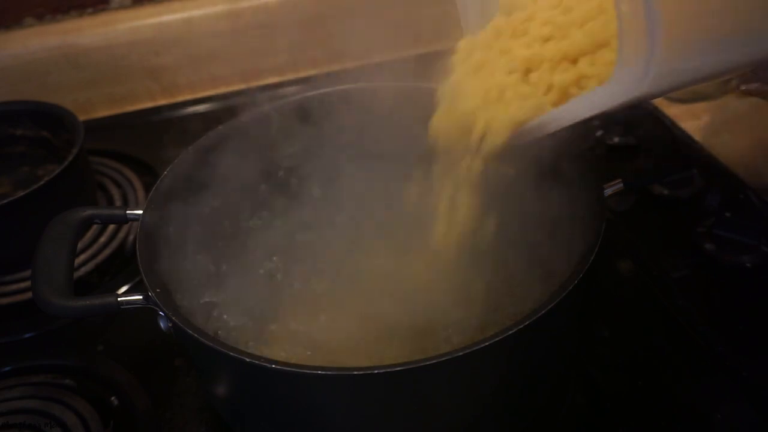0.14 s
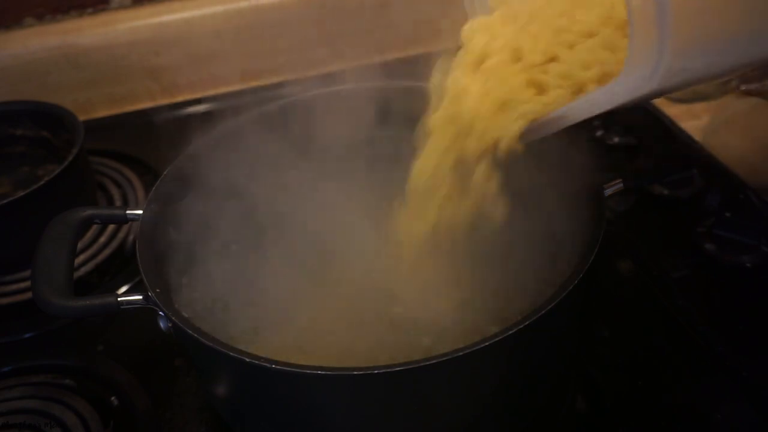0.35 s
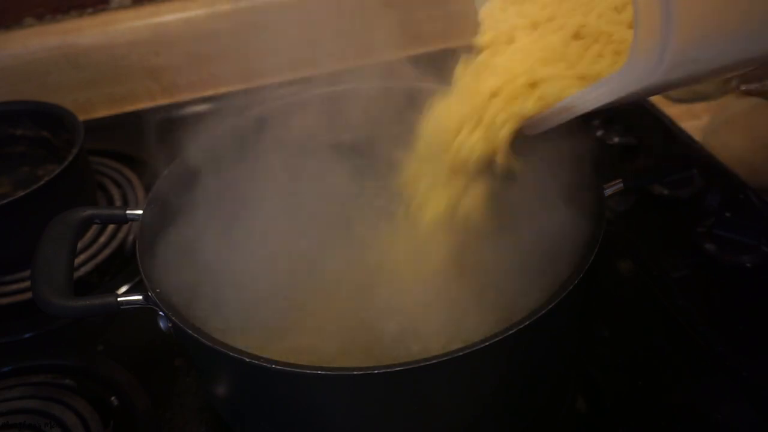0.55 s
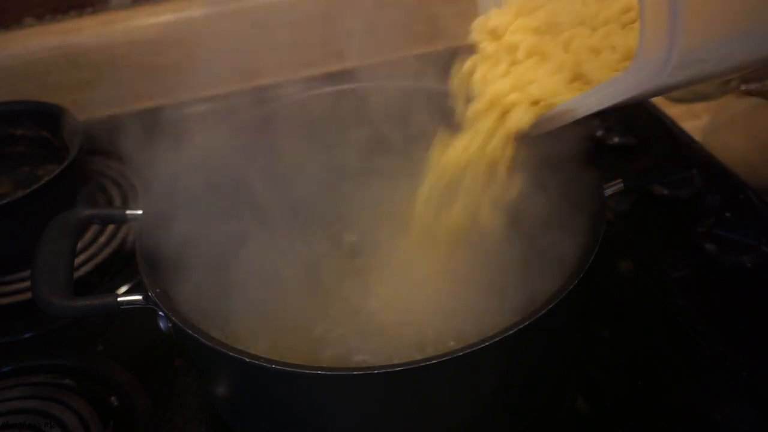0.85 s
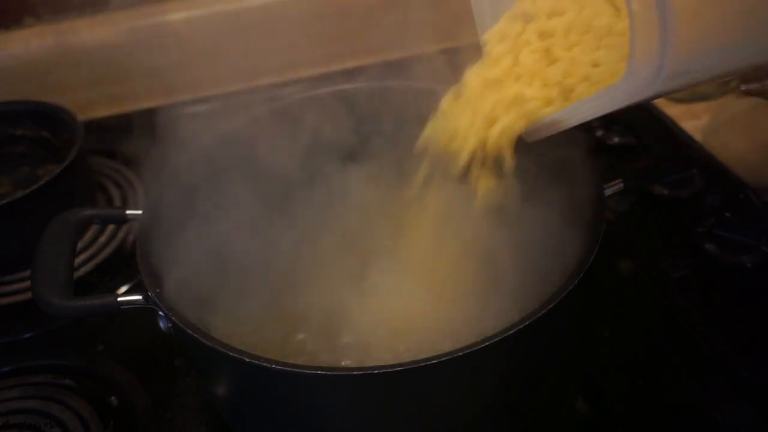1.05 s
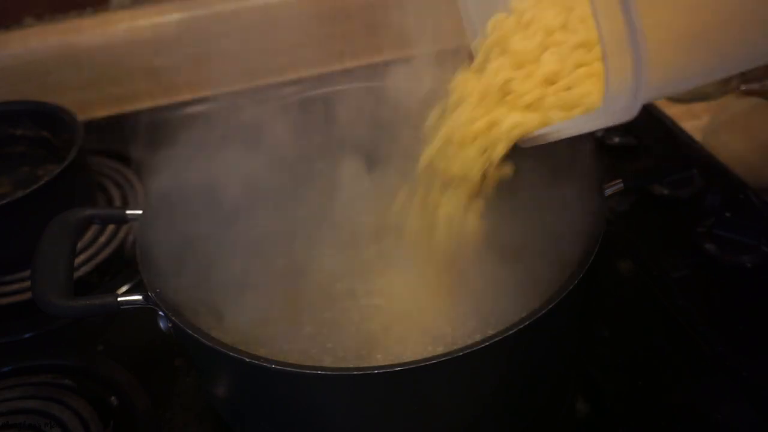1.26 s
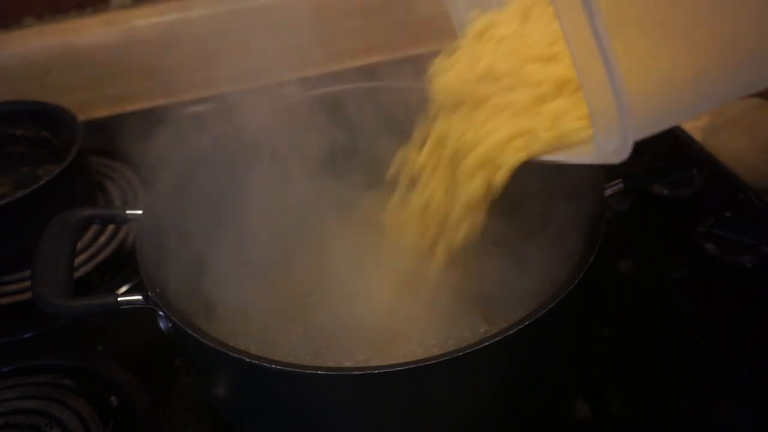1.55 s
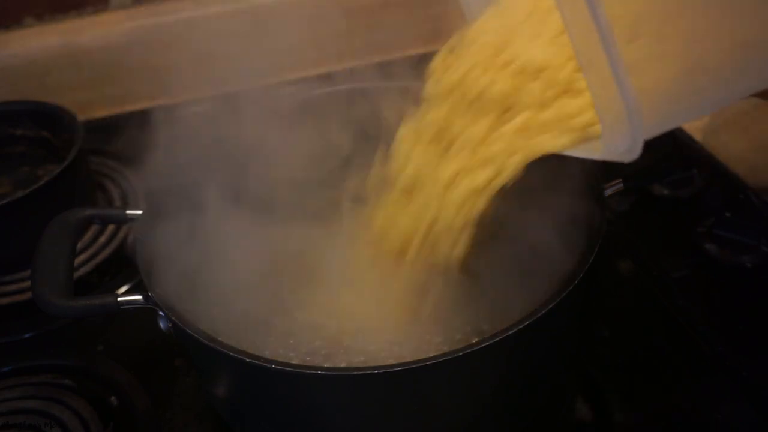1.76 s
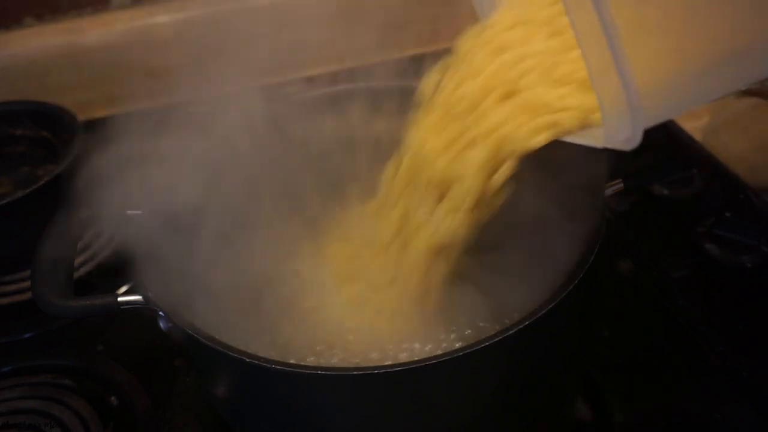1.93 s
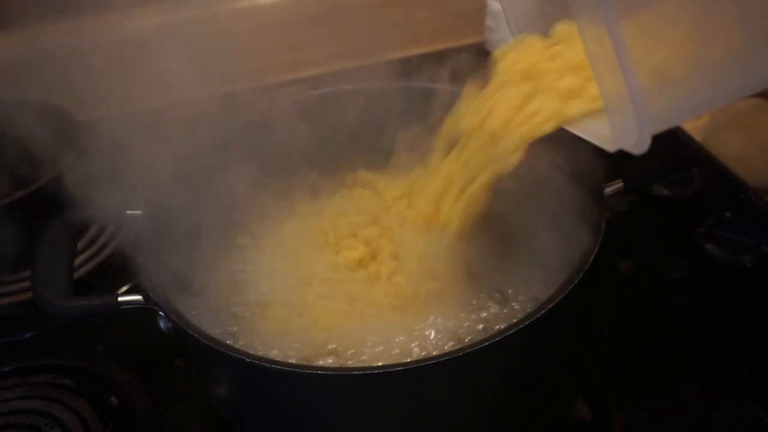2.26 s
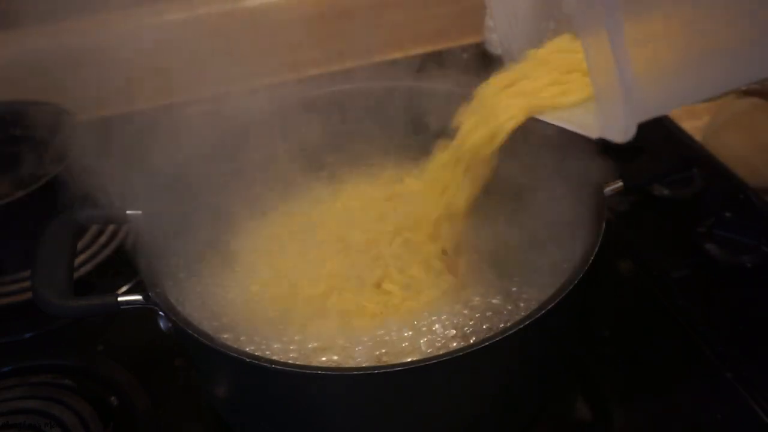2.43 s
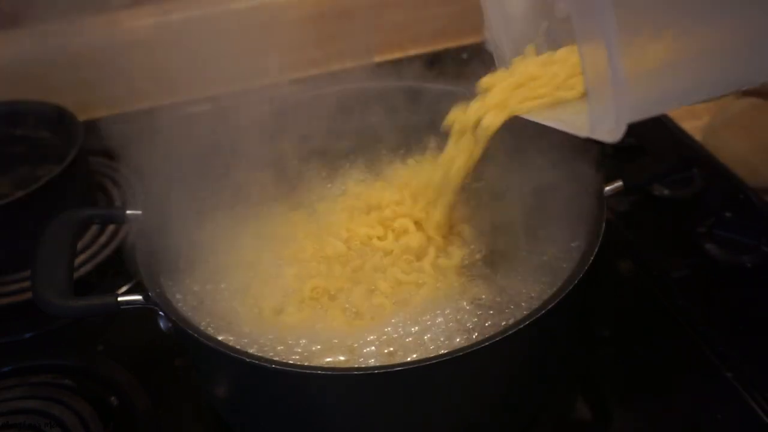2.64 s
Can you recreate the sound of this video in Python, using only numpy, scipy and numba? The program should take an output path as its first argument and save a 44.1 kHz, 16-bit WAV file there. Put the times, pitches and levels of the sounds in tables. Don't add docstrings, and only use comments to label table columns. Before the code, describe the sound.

A continuous rush of hard pasta pieces ticks, pings and plunges into hot water, ringing the pot, then piles into a rattling, fizzing heap and thins slightly; recorded close in stereo, indoors, with faint early hum.

```python
import sys
import numpy as np
from scipy import signal
from scipy.fft import rfft, irfft, next_fast_len
from scipy.io import wavfile
from scipy.ndimage import uniform_filter1d
from numba import njit

SR = 44100
rng = np.random.default_rng(int(sys.argv[2]) if len(sys.argv) > 2 else 0)


def amplitude_ratio(level_db):
    exponent = np.asarray(level_db, float) / 20
    return 10 ** exponent


def store_pcm(level_fs):
    pcm = np.round(np.clip(level_fs, -1, 1) * 32767).astype(np.int16)
    wavfile.write(sys.argv[1], SR, np.atleast_2d(pcm).T)


N = 123479
LEAD_IN = 64


def unit(x):
    return x / np.sqrt(np.mean(x ** 2))


def curve(table, axis):
    rows = np.array(table)
    return np.interp(np.arange(N) / SR, rows[:, 0], rows[:, axis])


def walk(rate_hz):
    hold = int(SR / rate_hz)
    steps = np.repeat(rng.standard_normal(400), hold)[:N + hold]
    slewed = uniform_filter1d(uniform_filter1d(steps, hold), hold)[:N]
    return slewed / slewed.std()


def colour(x, table):
    hz, rows = np.fft.rfftfreq(4096, 1 / SR) + 1, np.array(table)
    gain = amplitude_ratio(np.interp(np.log(hz), np.log(rows[:, 0]), rows[:, 1]))
    cepstrum = irfft(np.log(gain))
    cepstrum[1:2048] *= 2
    cepstrum[2049:] = 0
    impulse = irfft(np.exp(rfft(cepstrum)))
    return signal.fftconvolve(x, impulse[None], axes=1)[:, :N]


@njit
def rings(at_s, hz, cycles, left, right, lag, n):
    out = np.zeros((2, n + 4096))
    for k in range(len(at_s)):
        turn = np.exp(2j * np.pi * hz[k] / SR - hz[k] / SR / cycles[k])
        start_l = at_s[k] * SR
        start_r = start_l + lag[k]
        i, j = int(start_l), int(start_r)
        ring_l = turn ** (i + 1 - start_l)
        ring_r = turn ** (j + 1 - start_r)
        for m in range(min(4000, int(5 * cycles[k] * SR / hz[k]) + 2)):
            out[0, i + 1 + m] += left[k] * ring_l.imag
            out[1, j + 1 + m] += right[k] * ring_r.imag
            ring_l *= turn
            ring_r *= turn
    return out[:, LEAD_IN:n + LEAD_IN]


def shower(count, lo_hz, hi_hz, cycles, scatter_db, pan_db, spread_db, spread_us):
    calming = 0.72
    when, pitch, rarity = rng.random((count, 3)).T
    place, delay, other = rng.standard_normal((count, 3)).T
    hz = np.minimum(lo_hz * (hi_hz / lo_hz) ** pitch, .45 * SR)
    size_db = -scatter_db * (3.5 + np.log(rarity + 0.0047)) * (1 - calming * when)
    size = amplitude_ratio(size_db) * hz / hi_hz * np.sign(other)
    pan = pan_db + np.clip(spread_db, 0, 5) * place
    lag = np.clip(spread_us * 1e-6 * SR * delay, -30, 30)
    at_s = 32 / SR + when * N / SR
    return unit(rings(at_s, hz, cycles * amplitude_ratio(2.96 * other), size * amplitude_ratio(pan / 2), size * amplitude_ratio(-pan / 2), lag, N))


def ring_pot(x, db, heap):
    # (frequency [Hz], width [Hz], level [dB])
    modes = [(355.6, 85, 16), (795, 37, 0.5), (963, 56, 0.5), (1170, 60, -6), (1620, 290, -11),
             (2290, 70, -5), (2410, 41, 1), (3022, 61, -2), (3480, 68, -2), (3825, 150, -4),
             (4570, 380, -11)]
    waver_db, waver_hz, heap_db = 1.5, 18.0, 1
    out = x
    for hz, width_hz, mode_db in modes:
        level_db = db + mode_db + waver_db * walk(waver_hz) + heap_db * heap * (1500 < hz < 2700)
        out = out + amplitude_ratio(level_db) * signal.lfilter(*signal.iirpeak(hz, hz / width_hz, fs=SR), x)
    return out


def rattle(flow_db, heap):
    # (frequency [Hz], level [dB])
    tick_colour = [(400, -84), (1500, -27.5), (2500, -7), (5000, -5), (9000, -3), (10800, -6), (13000, -1),
                   (15700, -3.5)]
    ticks = shower(count=16000, lo_hz=1506.0, hi_hz=19860.0, cycles=3.0,
                   scatter_db=2.0, pan_db=-1.5, spread_db=4.0, spread_us=16.4)
    clumps_db = (1 - 1.1 * heap) * (0.47 * walk(21.0) + 2.3 * walk(80))
    return unit(colour(ticks, tick_colour)) * amplitude_ratio(-4.5 + flow_db + 4.1 * heap + clumps_db)


def splash(flow_db, heap):
    # (frequency [Hz], level [dB])
    splash_colour = [(250, -38), (550, -26), (800, -7), (1400, -7.5), (2400, -2.5), (4000, -1), (9000, -6),
                     (16000, -4.5)]
    level_db, heap_db = -3, -12
    plops = shower(count=20000, lo_hz=397.3, hi_hz=18600.0, cycles=1.76,
                   scatter_db=1.5, pan_db=-1.34, spread_db=3.5, spread_us=27.8)
    wet = unit(colour(ring_pot(plops, 1.0, heap), splash_colour))
    clumps_db = (1 - 0.7 * heap) * (0.27 * walk(18.1) + .8 * walk(59.96))
    return wet * amplitude_ratio(level_db + flow_db + heap_db * (heap - .5) + clumps_db)


def knocks():
    # (time [s], crack level [dB], ring level [dB], ring pitch [Hz])
    hits = [(0.0074, 1, -31, 2400), (0.0792, 0, -25, 2480), (0.1111, -4, -29, 2100),
            (0.1182, -14, -19, 4850), (0.145, -13, -36, 3140), (0.1715, -6, -34, 4580),
            (0.1844, -4, -26, 3930), (0.2083, -15, -18, 2370), (0.229, -13, -21, 3050),
            (0.2325, -8, -19, 2310), (0.2424, -13, -26, 3940), (0.2614, -10, -26, 3860),
            (0.2816, -4, -20, 2290), (0.2958, -12, -28, 2270), (0.4154, -11, -25, 2220),
            (0.424, 2.5, -22, 3040), (0.559, -11, -12.5, 3740), (0.617, 2, -30, 2430),
            (0.737, -11, -23, 2840), (0.801, -11, -20, 2260), (0.9149, -17, -15, 3200),
            (1.0816, -9, -19, 2380), (1.1734, -15, -20, 2200), (1.258, -6, -24, 4600),
            (1.412, -19, -31, 4530), (2.6708, -19, -24, 3460), (2.709, -18, -30, 3120),
            (2.7362, -12, -20, 4170), (2.7616, -12, -20.5, 4690)]
    at_s, crack_db, ring_db, ring_hz = np.array(hits).T
    at_s = np.r_[at_s, at_s] + LEAD_IN / SR + 0.000762
    size = amplitude_ratio(np.r_[crack_db - 1, ring_db + 6.5])
    hz = np.r_[0 * ring_hz + 13000., ring_hz]
    cycles = np.r_[0 * ring_hz + 1.3, 0 * ring_hz + 3.0]
    sound = rings(at_s, hz, cycles, size * amplitude_ratio(-3.5), size * amplitude_ratio(1.0), 0 * at_s, N)
    return signal.sosfilt(signal.butter(3, 1200, "high", fs=SR, output="sos"), sound)


def pings():
    # (time [s], level [dB], pitch [Hz])
    collisions = [(0.005, -21, 4700), (0.006, -22, 8500), (0.007, -21, 14470), (0.007, -24, 12050),
                  (0.049, -21.5, 2410), (0.118, -20, 4850), (0.122, -18, 14980), (0.145, -16, 5700),
                  (0.17, -17, 8610), (0.184, -22, 12300), (0.207, -17, 2230), (0.233, -17, 13780),
                  (0.241, -16, 3960), (0.28, -21, 13600), (0.294, -16, 14980), (0.295, -27, 7570),
                  (0.303, -17.5, 2250), (0.318, -17, 5340), (0.321, -19, 9300), (0.422, -15.5, 4990),
                  (0.422, -21, 10160), (0.438, -17, 12570), (0.444, -21, 8700), (0.475, -15, 12230),
                  (0.478, -23, 9810), (0.491, -18, 11880), (0.548, -19, 8260), (0.586, -13, 12740),
                  (0.616, -16, 13200), (0.737, -20, 7750), (0.747, -26, 10200), (0.79, -15, 14290),
                  (0.801, -26, 10500), (0.851, -17, 8300), (0.886, -20, 14980), (0.951, -22, 10160),
                  (0.979, -19, 9600), (0.998, -17, 14400), (1.061, -17, 2920), (1.082, -20, 12570),
                  (1.092, -19, 11540), (1.098, -19, 13700), (1.1, -16, 10330), (1.1, -18, 2230),
                  (1.108, -21, 12910), (1.174, -19, 4820), (1.177, -25, 9200), (1.184, -21, 6800),
                  (1.234, -15, 13430), (1.26, -13, 14980), (1.28, -15.5, 4130), (1.28, -26, 13600),
                  (1.326, -12, 14980), (1.413, -14.5, 9700), (1.669, -20.5, 2410), (1.694, -17, 6100),
                  (1.715, -15, 12910), (2.135, -13, 14400), (2.709, -23, 6440), (2.778, -17, 9100)]
    level_db, decay_s, spread_s = -0.5, 0.0019, .0015
    at_s, db, hz = np.repeat(np.array(collisions), 3, axis=0).T
    delay, detune, place = rng.standard_normal((len(at_s), 3)).T
    size, pan = amplitude_ratio(db + level_db), -2.4 + 1.6 * place
    start_s = np.maximum(at_s + spread_s * delay, 0) + LEAD_IN / SR
    tones = rings(start_s, hz * (1 + 0.024 * detune), hz * decay_s,
                  size * amplitude_ratio(pan / 2), size * amplitude_ratio(-pan / 2), 0 * at_s, N)
    return signal.sosfilt(signal.butter(4, 1400, "high", fs=SR, output="sos"), tones)


def stream_db():
    # (time [s], level change [dB], half length [s])
    stream_changes = [(0.026, -3.5, 0.015), (0.09, -5, 0.019), (0.2, -5, 0.0046), (0.348, -4, 0.027),
                      (0.648, -1, 0.011), (0.82, -3.5, 0.01), (0.896, -3.5, 0.011), (1.025, -1.5, 0.018),
                      (1.139, -8, 0.013), (1.233, -3.5, 0.02), (1.735, -4, 0.015), (2.666, -6, 0.0057),
                      (2.701, -6, 0.0072), (2.744, -4.5, 0.018),
                      (0.225, 2.5, .016), (0.322, 2.2, .015), (.425, -1.5, 0.013), (0.552, 1.5, 0.018),
              (0.646, 0, 0.012), (0.773, -0.5, .02), (.85, -0.2, .015), (1.055, 1.6, 0.011),
              (1.101, 0, 0.0085), (1.187, 1.9, 0.013), (1.28, 0.6, 0.022), (1.47, 1.8, .02),
              (1.556, 2.6, 0.017), (2.147, 1.5, .012), (2.2, 2.8, 0.03), (2.78, 1.7, 0.011)]
    t = np.arange(N) / SR
    return sum(db * np.exp(-((t - at_s) / half_s) ** 2) for at_s, db, half_s in stream_changes)


def fizz(foam_db):
    # (frequency [Hz], level [dB])
    foam_colour = [(2000, -35), (4200, -12.5), (6400, -14), (9200, -6.5), (10800, -7), (13000, -2.5),
                   (15700, 2)]
    foam = shower(count=50000, lo_hz=2920.0, hi_hz=19000.0, cycles=5.7,
                  scatter_db=3.0, pan_db=-2.0, spread_db=5.0, spread_us=9.9)
    return unit(colour(foam, foam_colour)) * amplitude_ratio(foam_db + 0.4 * walk(30))


def simmer(hum_db, heap):
    # (frequency [Hz], level [dB])
    bubble_colour = [(30, -51), (90, -24), (200, -15.5), (330, -9), (560, -10.5), (850, -1.5), (1500, -9.5),
                     (4000, -20)]
    level_db, heap_db, hum_share = -33, -18.5, 0.21
    pops = shower(count=5000, lo_hz=138.0, hi_hz=3930.0, cycles=1.8,
                  scatter_db=1.5, pan_db=-0.2, spread_db=-2.0, spread_us=32.0)
    total_db = level_db + heap_db * heap + hum_share * (hum_db - hum_db.max()) + 0.76 * walk(8.6)
    return unit(colour(ring_pot(pops, -2.3, heap), bubble_colour)) * amplitude_ratio(total_db)


def hum(hum_db):
    # (frequency [Hz], level [dB], wobble [dB])
    partials = [(60, -21, 4), (120.5, -1, 3), (247.5, 1, 4), (587, 4, 3)]
    t = np.arange(N) / SR + np.array([[0], [.00015]])
    lines = 0
    for hz, db, wobble_db in partials:
        lines = lines + amplitude_ratio(db + wobble_db * walk(15.0)) * np.sin(2 * np.pi * (hz * t + rng.random()))
    return np.sqrt(2) * amplitude_ratio(hum_db) * lines


def kitchen(x):
    t60_s, level_db, band_hz = 0.078, -13, [700, 11900]
    t = np.arange(SR // 3) / SR
    tail = rng.standard_normal((2, len(t))) * amplitude_ratio(-60 * t / t60_s) * (t > .002)
    tail = signal.lfilter(*signal.butter(2, band_hz, "band", fs=SR), tail)
    tail = tail / np.sqrt((tail ** 2).sum(1, keepdims=True))
    return x + amplitude_ratio(level_db) * signal.fftconvolve(x, tail, axes=1)[:, :N]


def scene():
    # (time [s], flow level [dB], heap [0-1], foam level [dB])
    pour = [(0, -24, 0, -29), (.1, -22, 0.03, -32), (.2, -24, 0, -40), (.27, -20.5, 0, -31),
            (.58, -19, 0.26, -22), (.7, -19, 0.29, -36), (.9, -19.5, 0.29, -30), (1.08, -21, 0.12, -27),
            (1.3, -19, 0.37, -34), (1.45, -20, 0.35, -25), (1.7, -17.5, 0.58, -18), (1.76, -20, 0.52, -19),
            (2.0, -21.5, 0.6, -18), (2.18, -24, 0.86, -19.5), (2.3, -22.5, 0.97, -21.5),
            (2.5, -24.5, 1, -22.5), (2.65, -23, 1, -24), (2.8, -22.5, 0.93, -35)]
    # (time [s], level [dB])
    hum_steps = [(0, -58), (.55, -59), (.66, -66), (1.33, -66), (1.46, -75), (1.9, -79), (2.8, -79)]
    gaps_db, hum_db = stream_db(), curve(hum_steps, axis=1)
    flow_db, heap = curve(pour, axis=1) + gaps_db, curve(pour, axis=2)
    foam_db = curve(pour, axis=3) + 0.73 * gaps_db
    pasta = rattle(flow_db, heap) + splash(flow_db, heap) + knocks() + pings()
    water = fizz(foam_db) + simmer(hum_db, heap)
    return kitchen(pasta + water) + hum(hum_db)


def band_limit(x):
    return signal.sosfilt(signal.butter(12, 17070, fs=SR, output="sos"), x)


def record(dry):
    # (frequency [Hz], level [dB])
    right_port = [(100, 0.5), (1200, -0.46), (2200, 2.9), (4000, -2.07), (7000, 0), (11000, 0.3),
                  (16000, 3)]
    top_hz, slope_hz = 15900, 150
    n = next_fast_len(N + 4096)
    ports = np.vstack([dry[:1], colour(dry[1:], right_port)])
    low_pass = np.clip((top_hz - np.fft.rfftfreq(n, 1 / SR)) / slope_hz, 0, 1)
    mix = irfft(rfft(ports, n) * low_pass, n)[:, :N]
    return band_limit(mix)


dry = scene()
out = record(dry)
store_pcm(out)
```